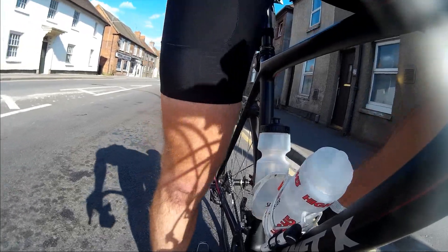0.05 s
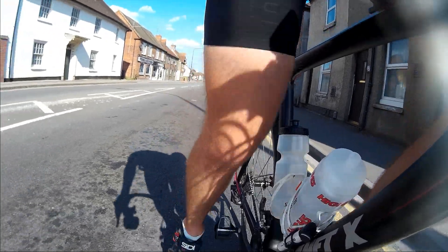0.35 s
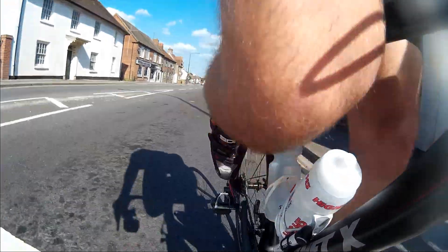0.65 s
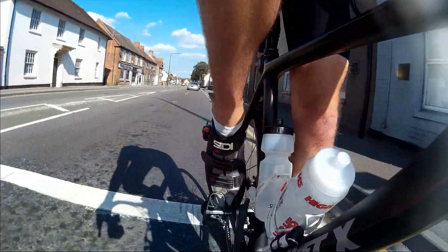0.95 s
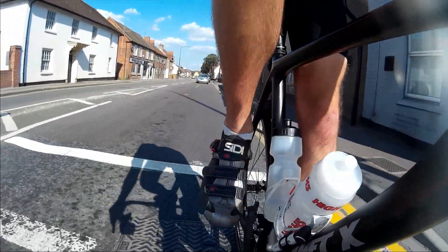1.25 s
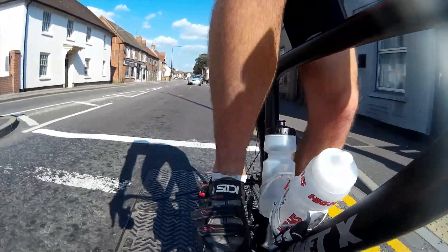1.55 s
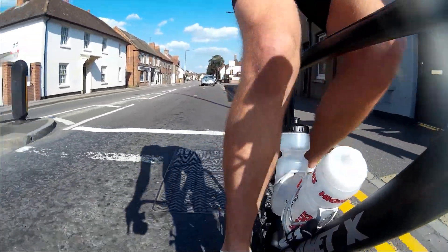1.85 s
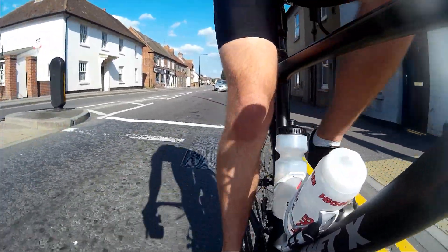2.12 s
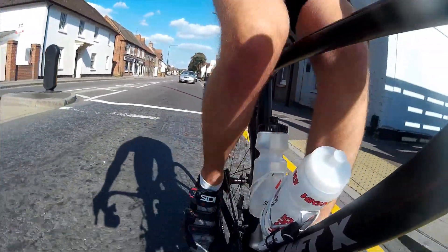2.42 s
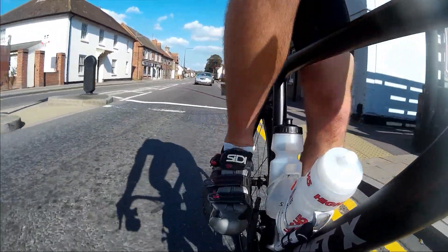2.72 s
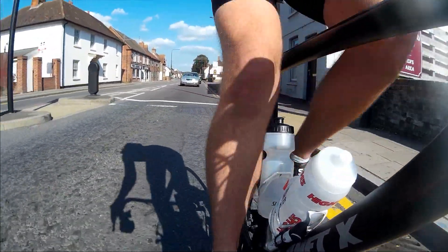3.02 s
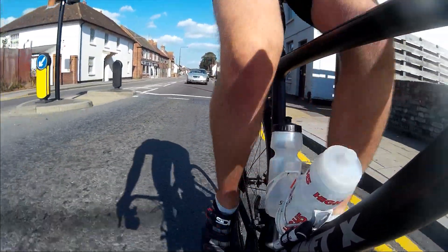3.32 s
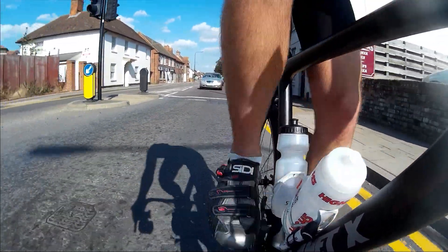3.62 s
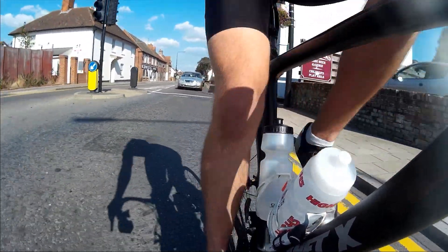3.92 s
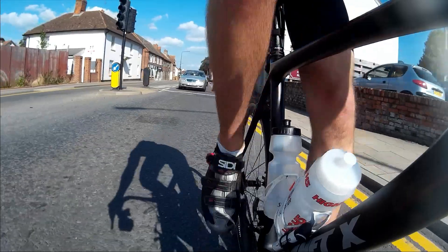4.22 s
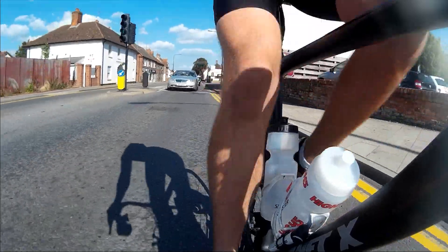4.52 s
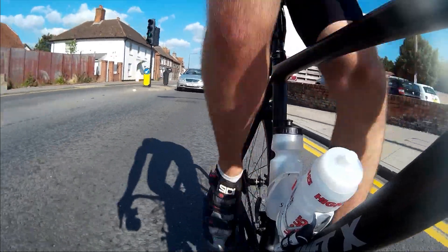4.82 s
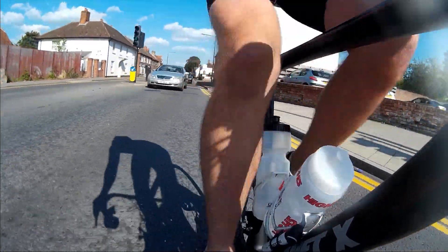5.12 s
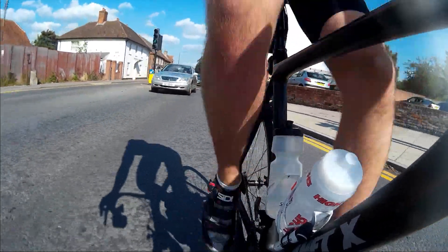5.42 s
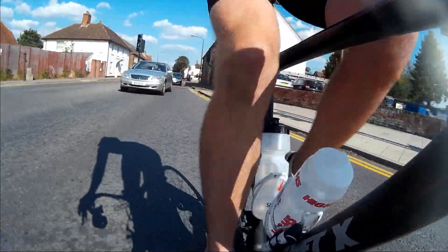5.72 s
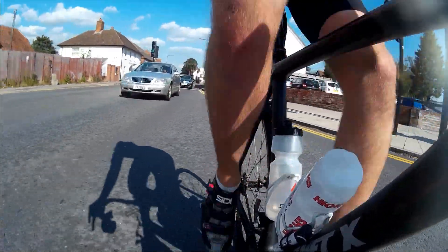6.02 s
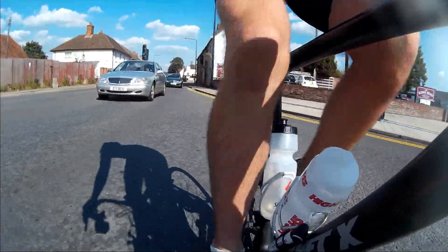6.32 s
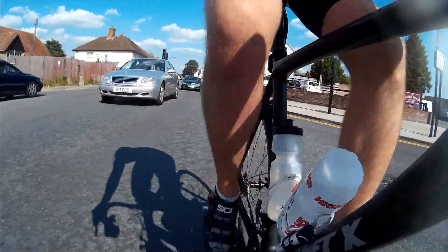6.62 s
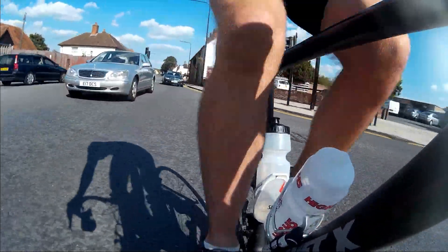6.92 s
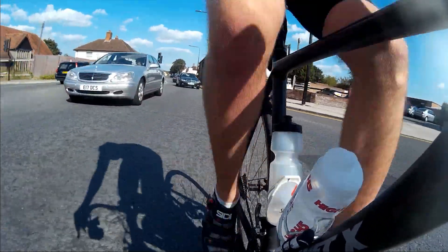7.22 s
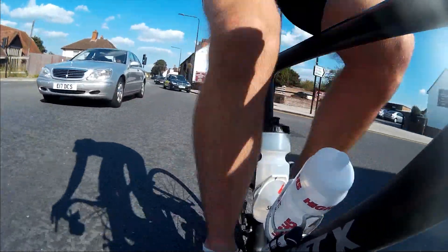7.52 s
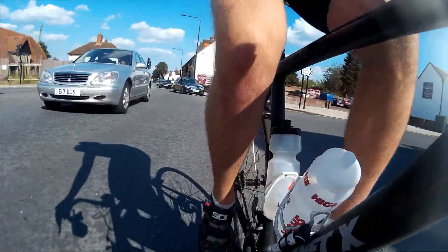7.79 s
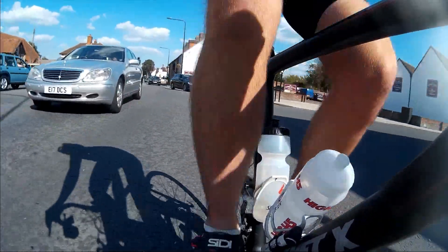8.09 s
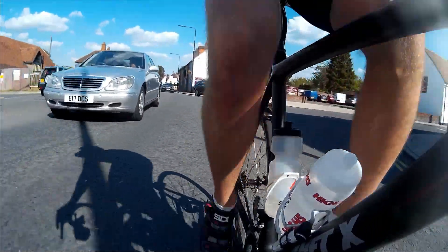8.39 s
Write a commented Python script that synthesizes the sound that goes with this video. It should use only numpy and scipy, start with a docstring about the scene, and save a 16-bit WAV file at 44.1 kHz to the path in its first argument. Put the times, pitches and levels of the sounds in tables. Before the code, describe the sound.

A road bike rides over asphalt, heard close and dry through a camera fixed to its frame. Low wind buffeting swells, and the mount rattles rapidly among dull bumps. The frame then settles into a droning rumble with tire roar and a faint buzz of loose parts. In the second half, bouts of fast clatter return, joined by sharp metal clacks from the chain and fittings.

```python
"""A camera on a road bike rocks on its mount and slaps its stop, in bouts about 36 times a second.
Bumps knock the frame, chain and fittings clack, loose parts tick in the case.
Asphalt grain shakes the frame into a rumble, roar and drone; wind buffets the case.
The hardest blows overload the microphone."""
import sys
import numpy as np
from scipy import signal
from scipy.fft import rfft, irfft, next_fast_len
from scipy.io import wavfile
from scipy.ndimage import uniform_filter1d, minimum_filter1d, map_coordinates

SR = 44100
rng = np.random.default_rng(int(sys.argv[2]) if len(sys.argv) > 2 else 0)


def pcm_store(signal):
    """Save signal as 16-bit PCM."""
    levels = np.round(np.clip(np.atleast_2d(signal), -1, 1) * 32767)
    wavfile.write(sys.argv[1], SR, levels.astype(np.int16).T)


N = 377055
TIME_S = np.arange(N) / SR

# spectral shapes: f/Hz, relative density/dB
BUFFET_SPECTRUM = [(8, -35.5), (22, -16.5), (35, -0.5), (48, -3.5), (70, -2.5), (110, -20.5), (300, -58),
                   (1000, -110)]
HISS_SPECTRUM = [(1000, -6), (3000, -0.5), (5000, 2.5), (7000, 3), (12000, 1.5), (15000, 0), (17000, -13.5)]
RUMBLE_SPECTRUM = [(30, -28), (60, -2), (80, -1), (130, -5), (220, -9), (265, -3.5), (340, -9),
                   (400, -17.5), (800, -39.5), (2500, -110)]
ROAR_SPECTRUM = [(200, -25.5), (420, -3.5), (560, 1.5), (780, -4), (1050, -4.5), (1200, -20.5), (1550, -15),
                 (1750, -20.5), (2050, -22.5), (2350, -41.5), (2700, -48.5), (3000, -56), (5100, -54),
                 (5800, -62.5)]
RATTLE_SPECTRUM = [(700, -21), (1700, -0.5), (2200, 7), (2600, 0.5), (3200, 4), (4600, -6), (5400, -12),
                   (8000, -31.5), (16000, -37)]
CASE_SPECTRUM = [(100, -13.5), (400, -5.5), (520, 3.5), (900, -2.5), (1150, -11.5), (2100, -15),
                 (2600, -28.5), (4600, -31), (5400, -45.5), (7500, -47), (9200, -50.5), (11000, -45.5),
                 (12500, -56.5), (16000, -67)]
SING_SPECTRUM = [(300, -35.5), (550, 3.5), (800, -5), (1200, -26), (2000, -25), (3000, -53.5)]
# resonances: f/Hz, width/Hz, boost/dB
FRAME_MODES = [(100.6, 18, 8), (188.6, 60, 11), (308.9, 13, 8.5), (342, 12, 8), (435, 34, 5.5),
               (661.5, 74, 7), (835, 50, 5), (1002, 30, 2.5), (1343, 130, 10.5), (1473, 90, 7.5),
               (1964, 110, 9)]
CASE_MODES = [(275, 160, 11), (590, 250, 6), (770, 54, 3.8), (937, 42, 3.3), (1348, 42, 6), (1806, 180, 6),
              (3030, 210, 5.5), (3940, 170, 5.7), (6060, 1100, 7)]
METAL_MODES = [(1340, 430, 13), (1770, 110, 7.9), (3240, 74, 8.9), (4270, 600, 1.8)]
SING_MODES = [(634, 34, 16), (691, 41, 15)]
# thud, clack, snap and sparkle bands: low/Hz, high/Hz
BANDS = [(230, 1100), (1150, 2400), (2600, 5100), (5900, 17000)]

# wind on the case: t/s, level/dB
WIND_LEVELS = [(0, -52.5), (.18, -34.5), (.31, -36.5), (.5, -22.5), (.9, -20.5), (1.3, -19), (1.65, -26.5),
               (2.05, -22.5), (2.3, -30), (3.15, -34), (3.9, -25), (4.2, -29), (4.88, -21), (6.0, -27.5),
               (6.5, -28.5), (7.25, -23.5), (8.1, -20), (8.4, -25), (8.55, -14)]
# shaking by the asphalt: t/s, frame rumble/dB, tyre roar/dB
ROAD_LEVELS = [(0, -55, -63), (.33, -41.5, -40), (.6, -32, -40.5), (.73, -26.5, -32), (1.2, -27, -32.5),
               (1.43, -45, -47.5), (1.6, -32, -37), (1.95, -21.5, -32), (2.4, -22, -30), (3.1, -21, -26.5),
               (3.9, -17.5, -21.5), (4.8, -19.5, -27), (6.1, -21.5, -27.5), (6.65, -18, -22),
               (6.82, -25.5, -34.5), (7.05, -19, -25.5), (7.42, -28.5, -32), (8.1, -20.5, -24),
               (8.55, -24, -27.5)]
# lowest frame mode: t/s, level/dB
BOOM_LEVELS = [(1.7, -37), (1.97, -24), (2.3, -25), (2.55, -36), (3.7, -36), (3.87, -17.5), (4.55, -19.5),
               (5.2, -23), (6, -22), (6.35, -35), (6.95, -22.5), (7.9, -25.5), (8.55, -21)]
# frame sings near 650 Hz: t/s, level/dB
SINGS = [(.28, -33), (1.569, -25.5)]
# chain and fitting strikes, nominal levels: t/s, clack/dB, snap/dB
CLACKS = [(0.132, -42.0, -66), (0.37, -42, -53), (1.818, -29.5, -66), (1.959, -43, -52.0),
          (2.203, -50, -51), (2.439, -40, -55), (4.091, -38, -51), (5.587, -21, -39.5), (5.603, -15, -43),
          (5.623, -9.5, -26.5), (5.709, -17.5, -29.5), (5.772, -25.5, -56), (6.673, -20, -37),
          (7.2, -18, -45), (7.2247, -13.5, -39), (8.489, -19.5, -38.5), (8.504, -21, -45),
          (8.525, -13.5, -37)]
# bumps, nominal levels: t/s, length/s, thud/dB, clack/dB
BUMPS = [(1.007, 0.0033, -13.5, -24), (1.213, 0.011, -13, -53), (1.2445, 0.0069, -2.5, -21.5),
         (1.508, 0.015, -8, -14.5), (1.531, 0.015, -15, -23.5), (1.564, 0.018, -14.5, -19.5),
         (1.582, 0.016, -21.5, -38), (2.114, 0.0029, -11, -30), (5.893, 0.015, -10.5, -20.5),
         (7.543, 0.02, -13, -19.5), (7.565, 0.0035, -10, -21.5)]
# rough patches with stray taps: start/s, end/s
ROUGH_SPANS = [(.7, 1.65), (4.55, 5.5), (6.85, 7.6)]
# single slaps on the stop, nominal levels: t/s, thud/dB, clack/dB, snap/dB, swing/dB
SLAPS = [(.6987, -38, -25, -37, -16), (.7561, -35, -26, -33, -19), (.7613, -8, -17, -37, -10),
         (.8159, -10, -19, -35.5, -15), (.8467, -16.5, -17, -33.5, -9), (.9993, -35, -26.5, -37.5, -23),
         (1.0121, -33, -19.5, -33, -13), (1.0357, -31, -30.5, -42.5, -20), (1.0905, -13, -20.5, -41, -18),
         (1.0967, -16.5, -19, -33.5, -14), (1.1233, -12.5, -15, -30, -6),
         (1.1499, -18.5, -24.5, -36.5, -14), (1.2534, -20, -25, -33.5, -15), (1.2896, -26, -24, -38, -7),
         (1.318, -14.5, -24, -38.5, -4), (1.5138, -9.5, -31, -33.5, -16), (1.5219, -21, -24.5, -39, -12),
         (4.5695, -23, -29, -43, -6.5), (4.6708, -14.5, -28, -44, -9), (4.8385, -10.5, -20, -36.5, -17),
         (5.145, -15, -26, -42, -16), (5.1732, -24.5, -21.5, -40.5, -5), (5.2882, -32, -31, -44.5, -15),
         (6.0072, -32, -28.5, -45, -9), (6.6571, -8.5, -14.5, -30.5, -4.5), (6.6904, -7.5, -9.5, -23.5, 2),
         (6.7204, -15, -15, -35.5, -3), (6.7502, -9.5, -17.5, -36.5, -3), (6.7779, -10, -15.5, -38, -2.5),
         (7.2878, -10.5, -14.5, -30, -1), (7.3183, -19, -26, -40, -12), (7.3464, -14, -21, -36, -3.5),
         (7.9453, -25, -28, -43, -8), (8.023, -42, -33, -47, -11), (8.3488, -11.5, -19, -36, -9.5),
         (8.3768, -8.5, -16.5, -27, -1), (8.4047, -22, -26, -41.5, -12.5), (8.4602, -18.5, -27, -41, -6)]
# steady rocking: start/s, end/s, first level/dB, last level/dB
BOUTS = [(1.395, 1.4774, -28, -28), (1.5702, 1.6248, -29, -37), (4.6922, 4.7191, -30, -27),
         (4.872, 4.927, -30, -37), (4.9597, 4.988, -27, -25), (5.0501, 5.0768, -29, -32),
         (7.6337, 7.6875, -36, -39), (5.338, 5.3619, -30, -28), (6.1667, 6.1922, -34, -27),
         (6.844, 6.9034, -34, -30), (7.0117, 7.0385, -31, -34), (7.085, 7.169, -32, -26),
         (7.1934, 7.2538, -24, -24), (7.3782, 7.437, -31, -37), (7.4622, 7.4916, -27, -33),
         (7.7498, 7.8061, -33, -30), (8.146, 8.2325, -29, -31)]
# offsets from the bout level: thud/dB, clack/dB, snap/dB, swing/dB
BOUT_OFFSETS = [4, -.5, -15, 17]

COARSE_START_S, COARSE_END_S, COARSE_FADE_S = 1.7, 3.9, 0.28


def amp(db):
    """Decibels to gain."""
    return 10 ** (np.asarray(db) / 20)


def unit(x):
    """Scale to rms 1."""
    return x / np.sqrt(np.mean(x ** 2) + 1e-20)


def curves(rows):
    """Per-sample curve for each column after the time."""
    times_s, *columns = np.transpose(rows)
    return [np.interp(TIME_S, times_s, column) for column in columns]


def wobble(knots_per_s):
    """Smooth random curve."""
    knots = rng.standard_normal(int(N * knots_per_s / SR) + 4)
    return map_coordinates(knots, [TIME_S * knots_per_s])


def colour(size, spectrum, modes=()):
    """Gain on an FFT grid: broad spectrum plus resonant humps."""
    hz = np.fft.rfftfreq(size, 1 / SR)
    knots_hz, knots_db = np.transpose(spectrum)
    humps_db = sum(db / (1 + (2 * (hz - centre) / width) ** 2) for centre, width, db in modes)
    return amp(np.interp(np.log(hz + 1), np.log(knots_hz), knots_db) + humps_db)


def noise(spectrum, modes=(), grit=1):
    """Coloured noise, rms 1; grit modulates the force ahead of the resonances."""
    size = next_fast_len(N + SR // 4)
    force = grit * rng.standard_normal(N)
    return unit(irfft(rfft(force, size) * colour(size, spectrum, modes), size)[:N])


def body_response(spectrum, modes, size=4096):
    """Causal impulse response of a body, split into BANDS."""
    cepstrum = irfft(np.log(colour(size, spectrum, modes) + 1e-6))
    response = irfft(np.exp(rfft(2 * cepstrum[:size // 2], size)))
    filters = [signal.butter(3, band, "bandpass", fs=SR, output="sos") for band in BANDS]
    return [signal.sosfilt(sos, response) for sos in filters]


def strike(body, levels_db, length_s, tail_db, tail_s, size=4096):
    """Contact chatter and its fading buzz ring each band; levels are energy as rms over 10 ms."""
    t = np.arange(size) / SR
    envelope = np.exp(-(t / length_s) ** 2) + amp(tail_db) * np.exp(-t / tail_s)
    force = rng.standard_normal(size) * envelope
    parts = [signal.fftconvolve(force, band)[:size] for band in body]
    return sum(amp(db) * p * np.sqrt(SR / 100 / np.sum(p ** 2)) for p, db in zip(parts, levels_db))


def damped_sine(hz, decay_s, size=SR // 5):
    """One mode ringing down."""
    t = np.arange(size) / SR
    return np.sin(2 * np.pi * hz * t) * np.exp(-t / decay_s)


def sparkle_db(snap_db):
    """Harder contacts are shorter, so the top band grows faster than the snap."""
    return 1.374 * snap_db - 1


def add(track, at_s, sound):
    """Mix a sound into the track."""
    part = track[max(round(at_s * SR), 0):][:len(sound)]
    part += sound[:len(part)]


def scatter(spans, per_s):
    """Random events within the spans: t/s, level offset/dB."""
    draws = rng.random((200, 2))[:round(per_s * N / SR)]
    events = [(N / SR * when, 6 * (size - .5)) for when, size in draws]
    return [(s, db) for s, db in events if any(start < s < end for start, end in spans)]


def coarseness():
    """1 on the coarse asphalt, 0 off it."""
    inside_s = np.minimum(TIME_S - COARSE_START_S, COARSE_END_S - TIME_S)
    return np.clip(inside_s / COARSE_FADE_S, 0, 1)


def wind(hiss_db=-71, coarse_boost_db=3.5):
    """Eddies thump the case over a thin hiss that rises on coarse asphalt."""
    buffet = amp(curves(WIND_LEVELS)[0] + 1.3 * wobble(7.4)) * noise(BUFFET_SPECTRUM)
    hiss = amp(hiss_db + coarse_boost_db * coarseness()) * noise(HISS_SPECTRUM)
    return buffet + hiss


def drone(hz, wander, knots_per_s, flutter_db):
    """A mode kept ringing by random pushes; pitch and strength waver."""
    phase = 2 * np.pi * np.cumsum(hz * (1 + wander * wobble(knots_per_s))) / SR
    return unit(amp(flutter_db * wobble(knots_per_s)) * np.sin(phase))


def frame_song(attack_s=0.055, fade_db_per_s=52.5):
    """The frame sings briefly as the tyres roll on."""
    swell = np.zeros(N)
    for at_s, db in SINGS:
        attack = np.clip((TIME_S - at_s) / attack_s, 0, 1)
        fade_db = fade_db_per_s * np.maximum(TIME_S - at_s - attack_s, 0)
        swell += attack * amp(db - fade_db)
    return swell * noise(SING_SPECTRUM, SING_MODES)


def road(rumble_db, roar_db):
    """Asphalt grain shakes the frame; its two lowest modes drone from the coarse stretch onward."""
    onset = np.clip((TIME_S - COARSE_START_S) / COARSE_FADE_S, 0, 1)
    boom = amp(curves(BOOM_LEVELS)[0]) * drone(hz=100, wander=.036, knots_per_s=22, flutter_db=2.7)
    hum = amp(rumble_db - 5.5) * drone(hz=184, wander=.055, knots_per_s=26, flutter_db=3.6)
    rumble = amp(rumble_db + 1.2 * wobble(6.3)) * noise(RUMBLE_SPECTRUM, FRAME_MODES)
    roar = amp(roar_db) * noise(ROAR_SPECTRUM, FRAME_MODES, grit=amp(2.1 * wobble(130)))
    return onset * (boom + hum) + rumble + roar + frame_song()


def rattle(roar_db, count=1100, decay_s=0.0026):
    """Loose parts tick in the case, mostly faintly; on coarse asphalt they merge into a buzz."""
    when, softness = rng.random((count, 2)).T
    ticks = np.bincount((when * N).astype(int), amp(-22 * np.sqrt(softness)), N)
    t = np.arange(SR // 40) / SR
    chatter = unit(signal.fftconvolve(ticks, np.exp(-t / decay_s))[:N])
    buzz_share = .45 + .15 * coarseness()
    grit = (1 - buzz_share) * chatter + buzz_share
    return amp(-48.5 + 0.43 * roar_db) * noise(RATTLE_SPECTRUM, CASE_MODES, grit)


def fittings():
    """Hard metal contacts: dry clack, thin ring. The chain also ticks faintly on coarse asphalt."""
    out, metal = np.zeros(N), body_response(CASE_SPECTRUM, METAL_MODES)
    ping = damped_sine(hz=3460, decay_s=0.025)
    ticks = [(s, db - 42.5, db - 59) for s, db in scatter([(COARSE_START_S, COARSE_END_S)], per_s=3)]
    for at_s, clack_db, snap_db in CLACKS + ticks:
        crack_db = 3.35 * clack_db - 9.5  # only the hardest blow cracks brightly
        top_db = max(sparkle_db(snap_db) - 18.5, crack_db)
        levels_db = [clack_db - 5.5, clack_db + 0.53, snap_db + 2.8, top_db]
        add(out, at_s, strike(metal, levels_db, length_s=0.0029, tail_db=-16, tail_s=0.008))
        add(out, at_s, amp(1.4 * snap_db - 7.5) * ping)
    return out


def bumps():
    """The tyre cushions each bump: the frame takes a long, dull blow and thumps."""
    out, frame = np.zeros(N), body_response(CASE_SPECTRUM, FRAME_MODES)
    for at_s, length_s, thud_db, clack_db in BUMPS:
        levels_db = [thud_db, clack_db - .3, clack_db - 29.5]
        add(out, at_s - .001, strike(frame, levels_db, length_s, tail_db=-16, tail_s=0.016))
        thump = damped_sine(hz=275 * rng.uniform(0.835, 1.1), decay_s=0.016, size=SR // 8)
        add(out, at_s, amp(thud_db - 2.5) * thump)
    return out


def rocking(period_s=.028):
    """Single slaps, bouts of one slap per swing, and stray taps; columns as SLAPS."""
    slaps = list(SLAPS)
    for start_s, end_s, first_db, last_db in BOUTS:
        count = round((end_s - start_s) / period_s) + 1
        bout = np.linspace((start_s, first_db), (end_s, last_db), count)
        slaps += [(s, *(db + np.array(BOUT_OFFSETS))) for s, db in bout]
    taps = [(s, db - 36.5, db - 36.5, db - 51, db - 19) for s, db in scatter(ROUGH_SPANS, per_s=6)]
    return slaps + taps


def camera_mount(swing_hz=19, reversal_s=0.00027):
    """The camera scrapes to its stop, hits, bounces, and grazes the far side half a swing later."""
    out, case = np.zeros(N), body_response(CASE_SPECTRUM, CASE_MODES)
    lag_s = np.arange(-SR // 10, SR // 10) / SR  # zero at impact
    reversal = -np.tanh(lag_s / reversal_s)
    swing = reversal * np.exp(-abs(lag_s) / .009) * np.cos(2 * np.pi * swing_hz * lag_s)
    case_ring = damped_sine(hz=3040, decay_s=.012)
    for at_s, thud_db, clack_db, snap_db, swing_db in rocking():
        hit_db = np.array([thud_db, clack_db, snap_db, sparkle_db(snap_db)])
        scrape_s, bounce_s, graze_s = rng.uniform([.001, .001, .014], [.005, .00354, .017])
        scrape = strike(case, hit_db - [36, 17, 23, 8.2], length_s=.0062, tail_db=-15, tail_s=.003)
        hit = strike(case, hit_db, length_s=.00057, tail_db=-29.5, tail_s=.0043)
        bounce = strike(case, hit_db - [14, 8.7, 7.5, 18], length_s=.0022, tail_db=-25.5, tail_s=.016)
        graze = strike(case, hit_db - [26.4, 19.8, 22.4, 32], length_s=.0013, tail_db=-13, tail_s=.0059)
        add(out, at_s + lag_s[0], amp(swing_db - 1) * swing)
        add(out, at_s - scrape_s, scrape)
        add(out, at_s, hit)
        add(out, at_s, amp(snap_db - 19) * case_ring)
        add(out, at_s + bounce_s, bounce)
        add(out, at_s + graze_s, graze)
    return out


def scene():
    """All sources reach one microphone through the case; no room."""
    rumble_db, roar_db = curves(ROAD_LEVELS)
    background = wind() + road(rumble_db, roar_db) + rattle(roar_db)
    return (background + bumps() + camera_mount() + fittings())[None]


def record(dry, ceiling=1.19, reaction_s=0.00082, cutoff_hz=16000):
    """Fast limiter, soft overload, then the camera's band limit."""
    window = round(reaction_s * SR)
    needed_gain = ceiling / np.maximum(np.abs(dry), ceiling)
    limited = dry * uniform_filter1d(minimum_filter1d(needed_gain, window), window)
    clipped = limited / (1 + np.abs(limited) ** 8) ** (1 / 8)
    size = next_fast_len(N + SR // 4)
    passband = np.fft.rfftfreq(size, 1 / SR) < cutoff_hz
    return irfft(rfft(clipped, size) * passband, size)[:, :N]


dry = scene()
out = record(dry)
pcm_store(out)
```